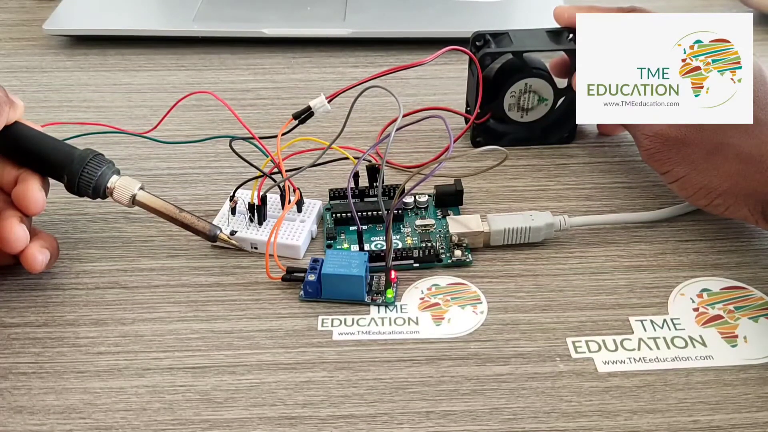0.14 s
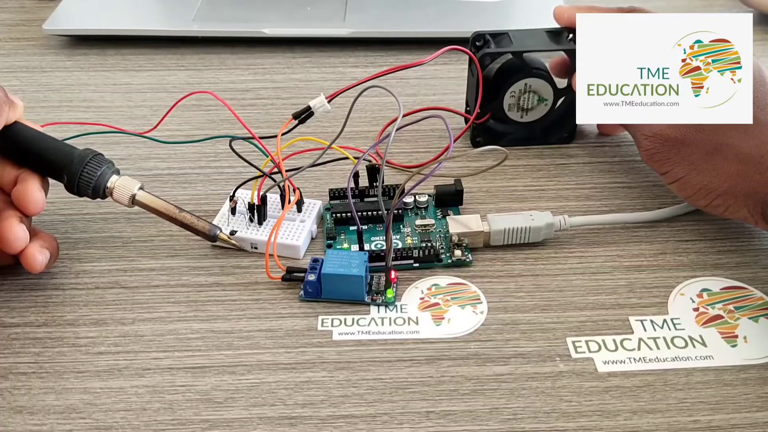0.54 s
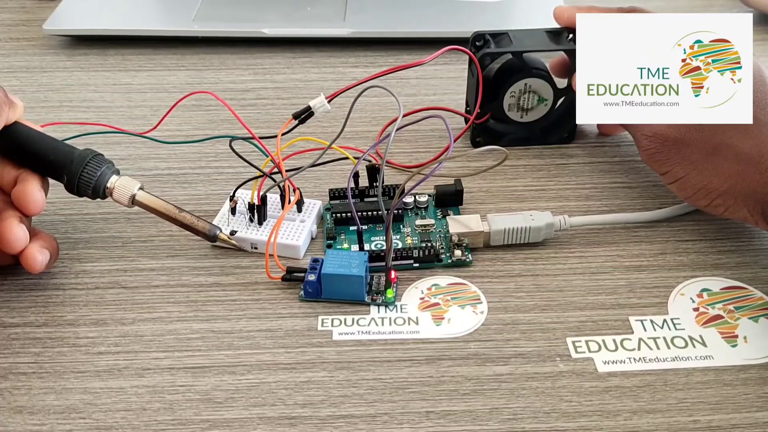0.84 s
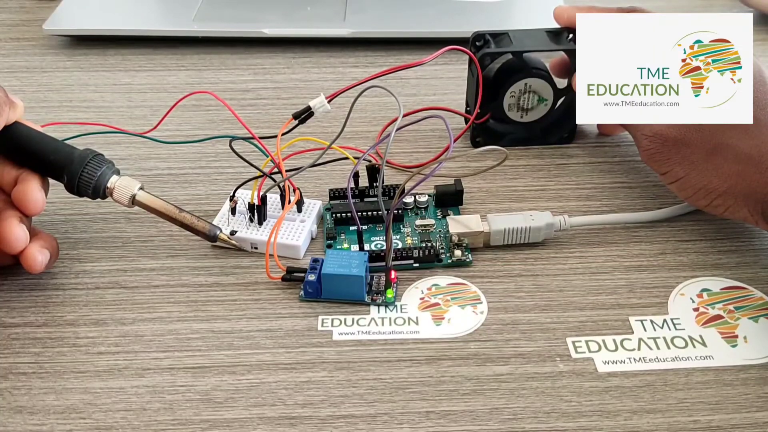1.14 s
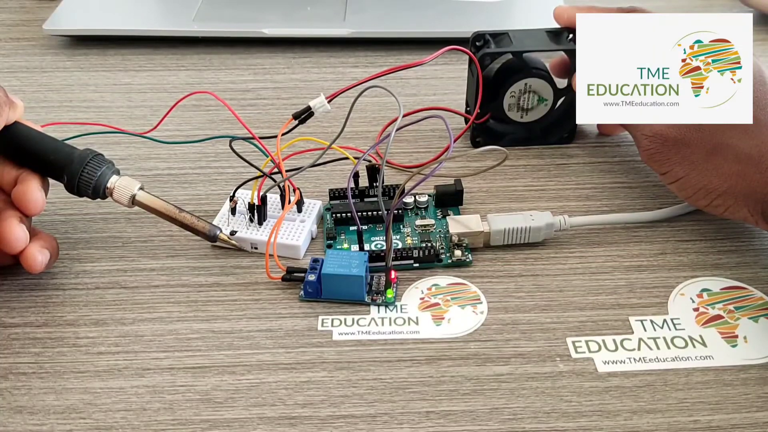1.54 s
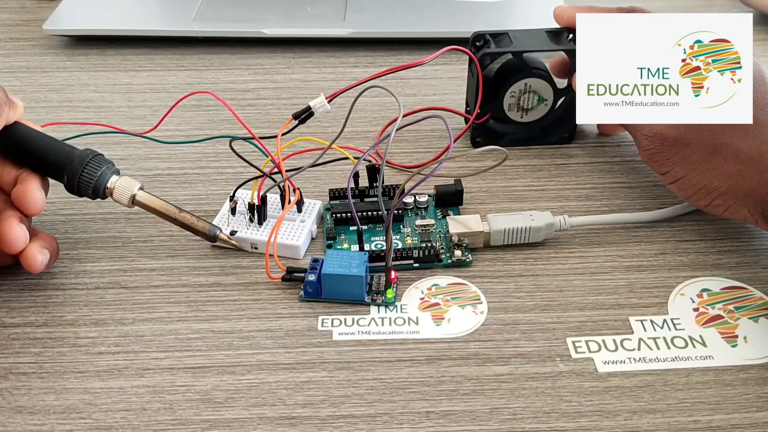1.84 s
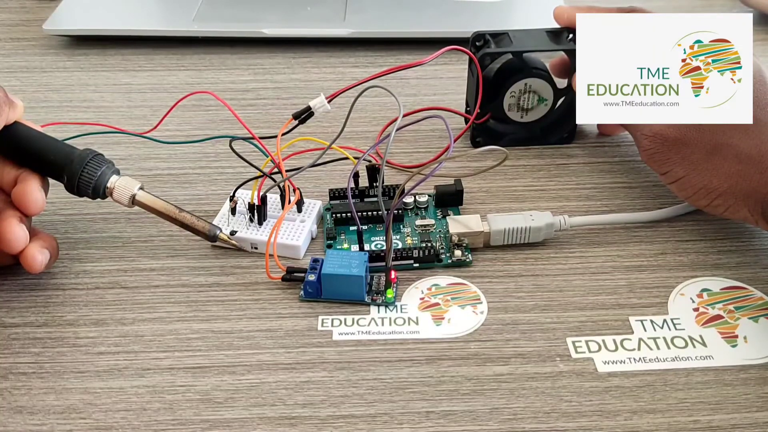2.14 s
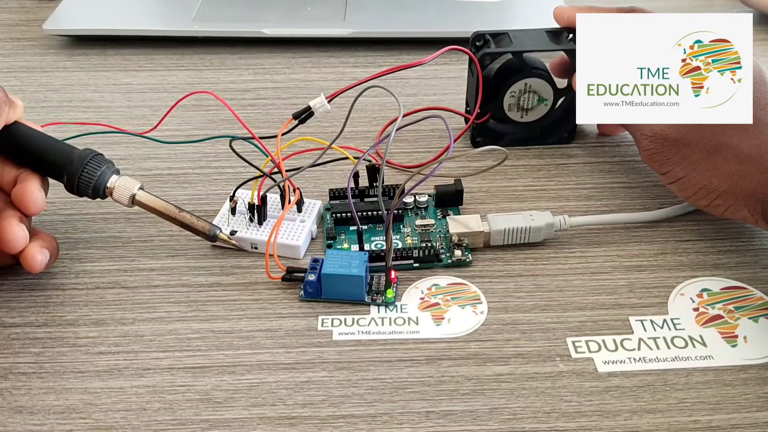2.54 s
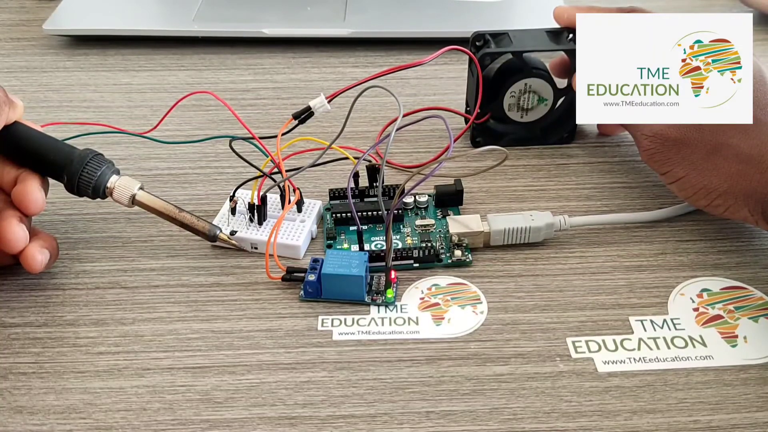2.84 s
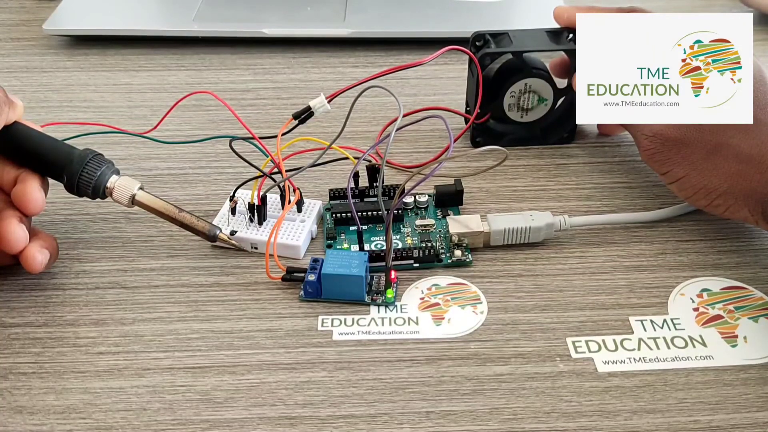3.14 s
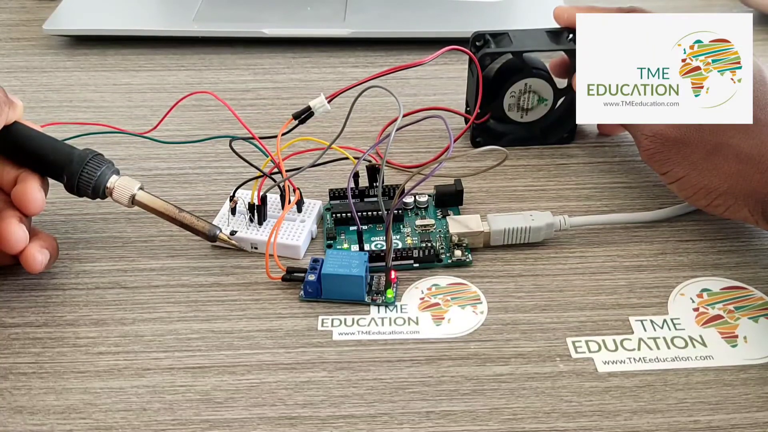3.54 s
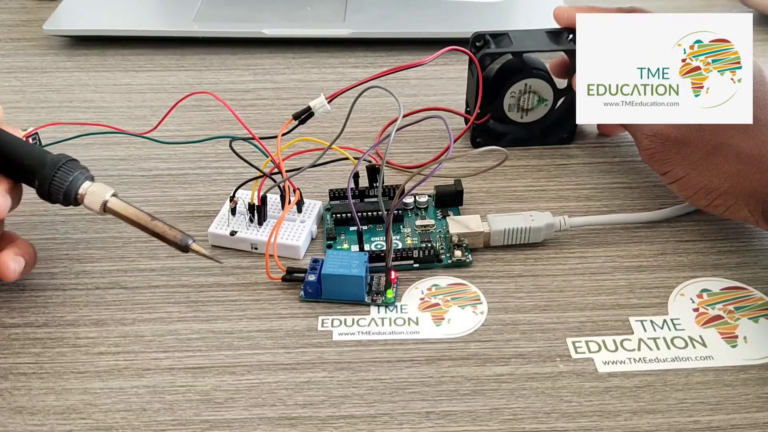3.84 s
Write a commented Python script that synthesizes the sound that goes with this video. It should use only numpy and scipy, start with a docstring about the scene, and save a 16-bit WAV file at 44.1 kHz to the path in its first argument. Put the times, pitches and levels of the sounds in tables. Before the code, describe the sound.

Small fan whirring at constant speed, breathy air noise and irregular low thumps of wind on the microphone.

```python
"""Small fan on a workbench

A seven-bladed cooling fan runs steadily close to a microphone: sines on multiples of its shaft speed
make the blade and motor tones, and shaped noise makes its air sound over the low rumble of the room.
Slow bell-shaped pushes of air rock the microphone, and an expander lifts everything as the level rises.
Filtered noise gives a brief rustle, and ringing tones start a hollow knock at the very end."""
import sys
import numpy as np
from scipy import signal
from scipy.fft import rfft, irfft
from scipy.io import wavfile
from scipy.ndimage import uniform_filter1d

SR = 44100
rng = np.random.default_rng(int(sys.argv[2]) if len(sys.argv) > 2 else 0)


def generate_wav(signal):
    """Clip the signal to [-1, 1] and save it as 16-bit WAV at the path in sys.argv[1]."""
    frames = np.transpose(np.atleast_2d(signal))
    scaled = np.clip(frames, -1, 1) * 32767
    pcm = np.round(scaled).astype(np.int16)
    wavfile.write(sys.argv[1], SR, pcm)


def magnitude_from_level(level_db):
    """Linear magnitude for a level in decibels (20 dB per decade)."""
    exponent = np.asarray(level_db, float) / 20
    return 10 ** exponent


N = 176400  # samples, 4 s
# The levels of all sources are those ahead of the expander in record().


def slow_wander(rate_hz):
    """Smooth random drift with a spread of 1, made by low-passing noise."""
    hop = 40  # samples between computed points
    settle = 2000  # points thrown away while the filter settles
    pole = np.exp(-2 * np.pi * rate_hz * hop / SR)
    noise = rng.standard_normal(N // hop + 2 + settle)
    drift = signal.lfilter([1], [1, -2 * pole, pole ** 2], noise)[settle:]
    return np.interp(np.arange(N) / hop, np.arange(len(drift)), drift / drift.std())


def rustle():
    """A brief rustle near the bench: low-mid noise that swells and fades."""
    # the rustles: start_s, length_s, level_db (rms at the fullest point)
    rustles = [(2.49, .11, -55), (2.6, .1, -54)]
    low_hz, high_hz = 350, 800
    t = np.arange(N) / SR
    band_pass = signal.butter(2, [low_hz, high_hz], "band", fs=SR, output="sos")
    noise = signal.sosfilt(band_pass, rng.standard_normal(N))
    shape = np.zeros(N)
    for start_s, length_s, level_db in rustles:
        progress = np.clip((t - start_s) / length_s, 0, 1)
        shape += magnitude_from_level(level_db) * np.sin(np.pi * progress)
    return shape * noise / noise.std()


def draught():
    """Slow air pushes or pulls on the microphone, each a bell-shaped swell of pressure."""
    # pushes (+) and pulls (-): centre_s, half_width_s (spread of the bell), pressure (full scale 1)
    swells = [(0.029, 0.008, -0.028), (0.072, 0.023, -0.032), (0.132, 0.017, -0.086), (0.18, 0.012, 0.034),
              (0.265, 0.022, 0.062), (0.323, 0.022, -0.056), (0.382, 0.016, 0.051), (0.423, 0.009, -0.022),
              (0.448, 0.008, 0.021), (0.47, 0.008, -0.016), (0.496, 0.009, 0.015), (0.523, 0.012, -0.059),
              (0.631, 0.009, -0.036), (0.686, 0.018, 0.047), (0.718, 0.008, -0.043), (0.761, 0.017, 0.05),
              (0.804, 0.017, -0.042), (0.829, 0.009, 0.028), (0.867, 0.012, -0.04), (0.941, 0.019, 0.067),
              (1.033, 0.008, 0.015), (1.072, 0.01, -0.032), (1.137, 0.019, -0.073), (1.201, 0.013, -0.04),
              (1.253, 0.013, -0.047), (1.371, 0.045, 0.062), (1.472, 0.011, 0.031), (1.511, 0.021, -0.074),
              (1.573, 0.014, -0.064), (1.639, 0.018, -0.054), (1.645, 0.012, 0.077), (1.711, 0.03, 0.047),
              (1.785, 0.01, 0.04), (1.818, 0.007, -0.015), (1.888, 0.024, -0.072), (1.989, 0.045, 0.038),
              (2.042, 0.013, -0.065), (2.109, 0.013, -0.024), (2.15, 0.014, 0.026), (2.167, 0.016, -0.03),
              (2.245, 0.006, 0.011), (2.301, 0.006, -0.014), (2.362, 0.034, 0.013), (2.475, 0.012, -0.016),
              (2.531, 0.017, -0.045), (2.631, 0.04, 0.025), (2.743, 0.011, 0.029), (2.783, 0.012, -0.032),
              (2.82, 0.01, 0.03), (2.868, 0.015, -0.056), (2.94, 0.006, -0.014), (3.019, 0.012, 0.03),
              (3.061, 0.02, -0.097), (3.089, 0.034, 0.079), (3.209, 0.014, 0.026), (3.272, 0.016, -0.027),
              (3.352, 0.019, -0.054), (3.455, 0.014, 0.047), (3.561, 0.013, 0.018), (3.618, 0.011, -0.076),
              (3.677, 0.012, -0.063), (3.715, 0.01, 0.022), (3.763, 0.013, -0.033), (3.796, 0.014, 0.076),
              (3.863, 0.025, 0.03), (3.975, 0.027, -0.03)]
    t = np.arange(N) / SR
    out = np.zeros(N)
    for centre_s, half_width_s, pressure in swells:
        reach_s = 4 * half_width_s  # the bell has all but vanished beyond this
        near = slice(max(int((centre_s - reach_s) * SR), 0), int((centre_s + reach_s) * SR))
        out[near] += pressure * np.exp(-0.5 * ((t[near] - centre_s) / half_width_s) ** 2)
    return out


def knock():
    """Pressure builds up quickly, lets go and leaves the modes ringing."""
    # what the knock rings with: pitch_hz, level_db (peak), t60_s (time to fade by 60 dB)
    modes = [(545, -18.5, .035), (800, -27, .008), (1150, -30, .02), (2200, -42, .015)]
    start_s, rise_s = 3.9947, 0.0005
    t = np.arange(N) / SR - start_s
    before = np.minimum(t, 0)
    after = np.maximum(t, 0)
    rings = np.zeros(N)
    for pitch_hz, level_db, t60_s in modes:
        rings += magnitude_from_level(level_db - 60 * after / t60_s) * np.cos(2 * np.pi * pitch_hz * after)
    build_up = np.exp(-0.5 * (before / rise_s) ** 2)
    return rings * build_up


def fan_air():
    """Turbulence noise coloured by its spectrum; overlapping octaves flicker separately."""
    # air noise of the fan over the low rumble of the room: pitch_hz, level_db (per Hz)
    spectrum = [(4, -70), (20, -65), (30, -65), (45, -67), (58, -66.5), (75, -73), (110, -79), (190, -82.5),
                (250, -78.5), (330, -80.5), (480, -79), (560, -79), (630, -83), (720, -78.5), (870, -76.5),
                (950, -83), (1050, -86), (1300, -81.7), (1900, -83), (2250, -86.5), (2600, -85.5),
                (2950, -93), (3200, -94), (3500, -91.5), (3700, -95.5), (3850, -93.5), (4100, -98.5),
                (4270, -96.5), (4700, -103), (5100, -103), (5600, -111), (5920, -107), (6550, -112.5),
                (6900, -106.5), (7300, -104.5), (7700, -107), (9500, -107.3), (11500, -110.6),
                (14000, -113.4)]
    flicker_db, flicker_rate_hz = 0.6, 12
    pitch_hz, level_db = np.transpose(spectrum)
    bin_hz = np.maximum(np.arange(N // 2 + 1) * SR / N, 1)
    colour = magnitude_from_level(np.interp(np.log(bin_hz), np.log(pitch_hz), level_db))
    noise = rfft(rng.standard_normal(N)) * colour * (bin_hz > pitch_hz[0])
    octave = np.clip(np.log2(bin_hz / 30), 0, 9)  # octaves above 30 Hz
    out = np.zeros(N)
    for k in range(10):
        share = np.maximum(1 - np.abs(octave - k), 0)  # fades into the neighbouring octaves
        band = irfft(noise * share, N)
        out += band * magnitude_from_level(flicker_db * slow_wander(flicker_rate_hz))
    return out * np.sqrt(SR / 2)  # from level per Hz to sample size


def fan_tones():
    """Sines on multiples of the shaft speed, each wavering a little in level."""
    # fan speed and swells: time_s, pitch_hz (14 times the shaft speed),
    # first_swell_db and second_swell_db (for the two lowest blade tones)
    speed = [(0.0, 842.7, 2, 3), (.4, 842.8, 0, 1), (1.02, 842.7, 0.5, .5), (1.5, 845, -2.5, 0),
             (2.01, 846.1, -2.5, .5), (2.45, 844, -1.5, -.5), (2.8, 841.2, 4.5, .5), (3.2, 842.5, .5, -.5),
             (3.5, 844.5, -4, -1.5), (3.9, 845.1, -1.5, 1), (4.0, 846, 2, 1)]
    # blade passing tones, seven a turn: multiple (of the shaft speed), level_db (rms)
    blade_tones = [(7, -53), (14, -50.8), (21, -59), (28, -60), (35, -70.5), (42, -69), (56, -70.5)]
    # unbalance, motor and strut tones: multiple (of the shaft speed), level_db (rms)
    shaft_tones = [(1, -56.5), (4, -69.5), (9, -67), (12, -72), (15, -79), (24, -75.5), (36, -59.5),
                   (47, -81), (55, -75.5), (59, -80), (64, -78.5)]
    jitter_share, jitter_rate_hz = 0.0008, 6  # share of the speed
    waver_db, waver_rate_hz = 1.5, 8
    t = np.arange(N) / SR
    time_s, pitch_hz, *swells_db = np.transpose(speed)
    shaft_hz = np.interp(t, time_s, pitch_hz) / 14
    jitter = 1 + jitter_share * slow_wander(jitter_rate_hz)
    turns = np.cumsum(shaft_hz * jitter) / SR
    out = np.zeros(N)
    for k, (multiple, level_db) in enumerate(blade_tones + shaft_tones):
        tone_db = level_db + waver_db * slow_wander(waver_rate_hz)
        if k < len(swells_db):
            tone_db = tone_db + np.interp(t, time_s, swells_db[k])
        sine = np.sin(2 * np.pi * (multiple * turns + rng.random()))
        out += np.sqrt(2) * magnitude_from_level(tone_db) * sine  # the root turns rms into peak
    return out


def scene():
    """Everything reaches one microphone."""
    mix = rustle() + draught() + knock() + fan_air() + fan_tones()
    return mix[None]  # one channel


def expander_gain_db(dry):
    """The recorder's fast expander: gain rises with the level, up to a limit, and falls below the pivot."""
    db_per_db, pivot_db, floor_db = 0.39, -30, -48
    range_db = 10.5  # no more lift this far above the pivot
    window_s = 0.0055
    power = uniform_filter1d(dry ** 2, int(window_s * SR), axis=1) + magnitude_from_level(floor_db) ** 2
    level_db = 10 * np.log10(power)
    return db_per_db * np.minimum(level_db - pivot_db, range_db)


def level_flutter_db():
    """The level flutters faintly and regularly, about 43 times a second."""
    flutter_hz, depth_db, peak_s = SR / 1024, 0.65, 0.006
    t = np.arange(N) / SR
    return depth_db * np.cos(2 * np.pi * flutter_hz * (t - peak_s))


def roll_off(x):
    """The treble ends steeply here."""
    return signal.sosfilt(signal.butter(12, 14170, fs=SR, output="sos"), x)


def record(dry):
    """Expander and faint flutter set the level of the whole mix."""
    gain_db = expander_gain_db(dry) + level_flutter_db()
    mix = dry * magnitude_from_level(gain_db)
    return roll_off(mix)


dry = scene()
out = record(dry)
generate_wav(out)
```